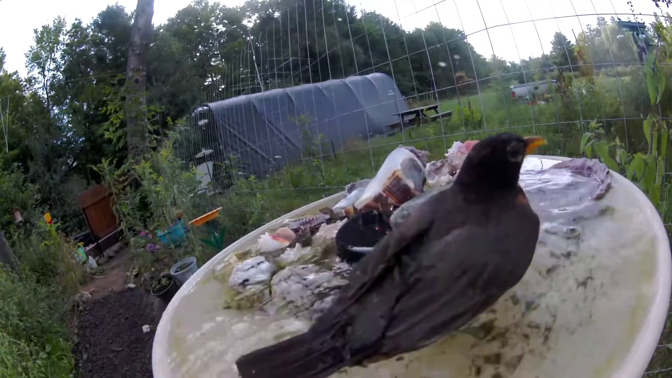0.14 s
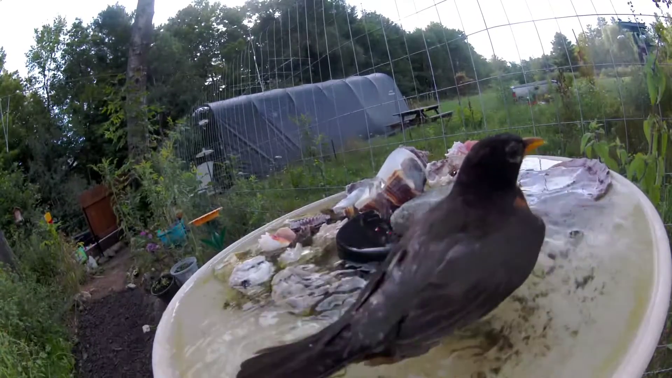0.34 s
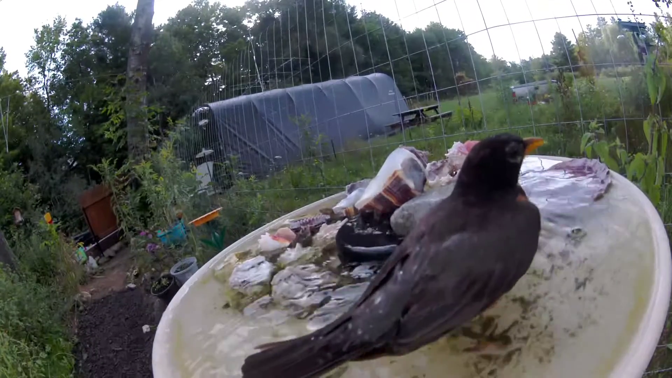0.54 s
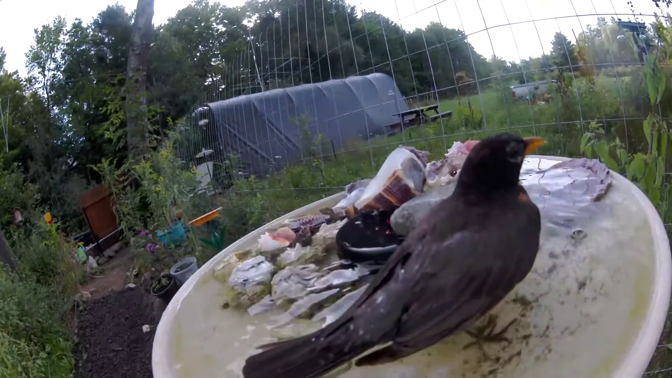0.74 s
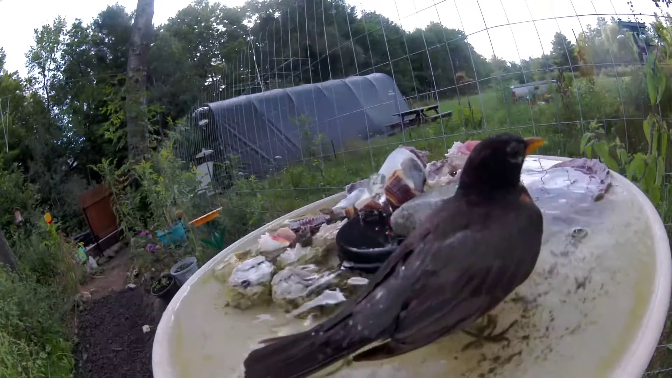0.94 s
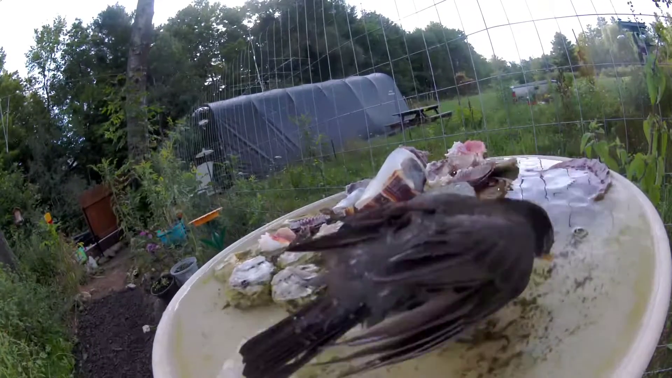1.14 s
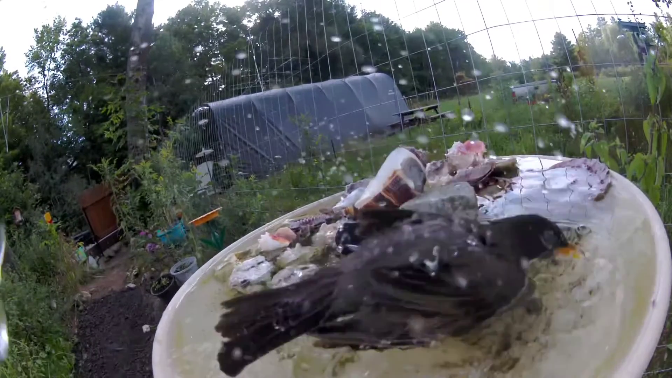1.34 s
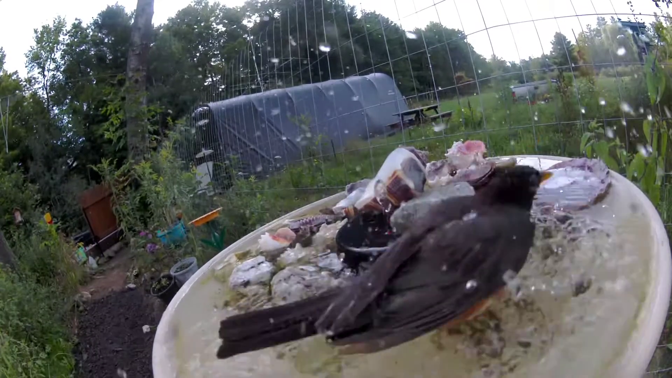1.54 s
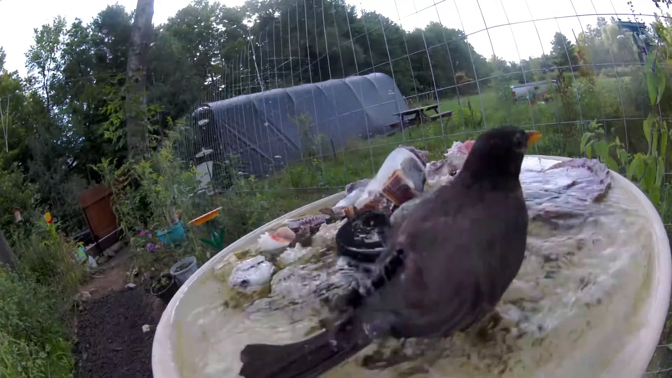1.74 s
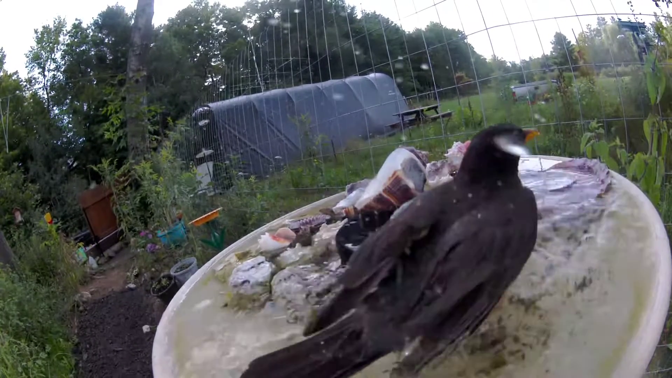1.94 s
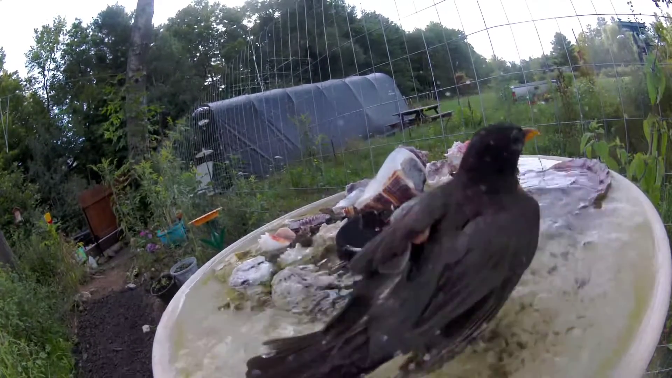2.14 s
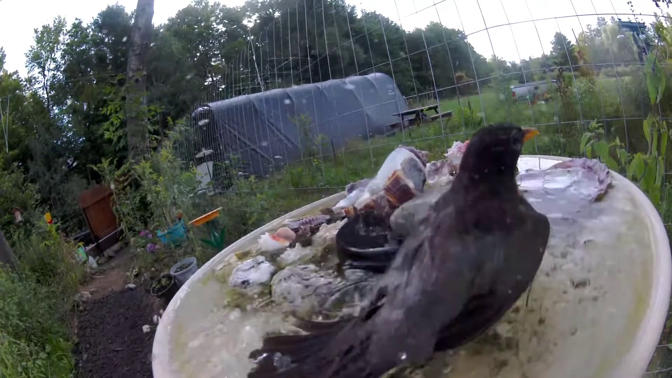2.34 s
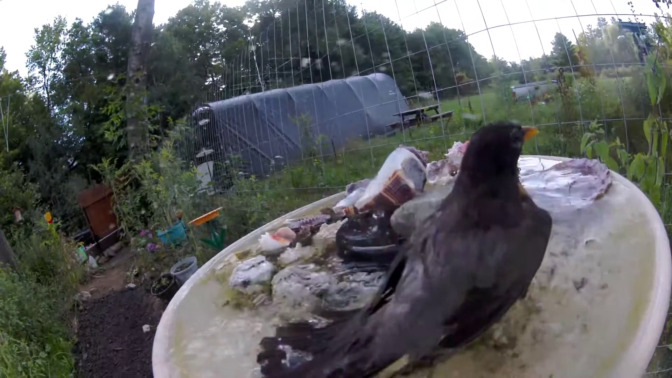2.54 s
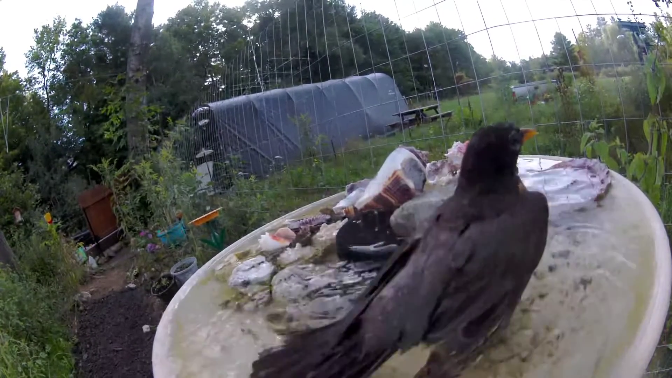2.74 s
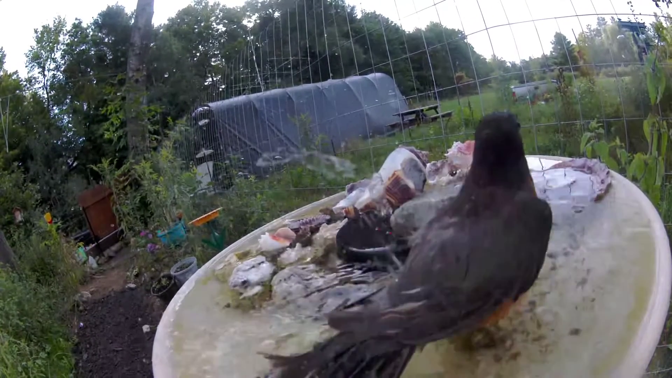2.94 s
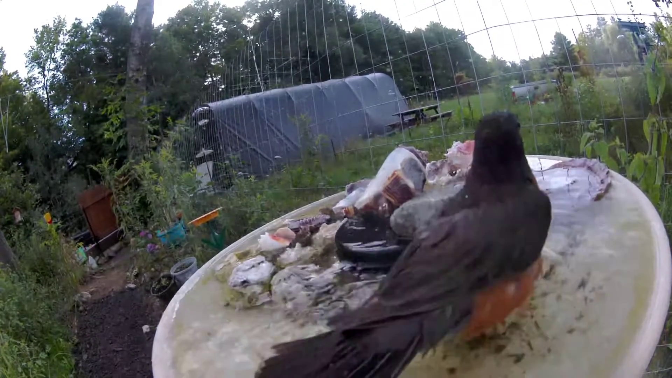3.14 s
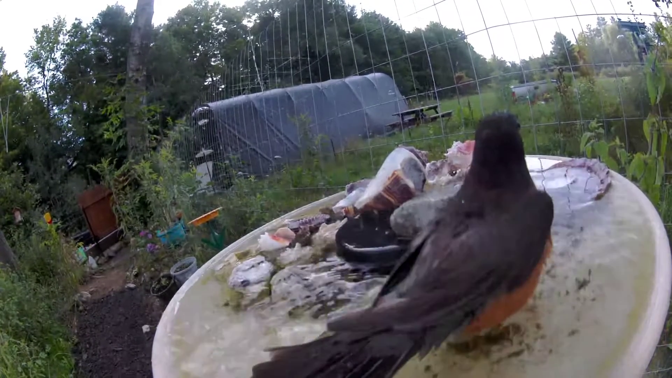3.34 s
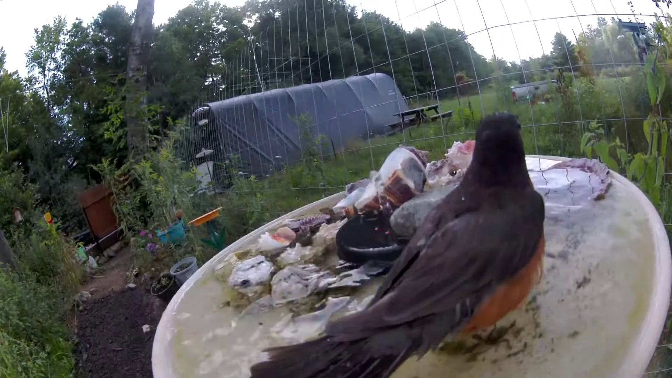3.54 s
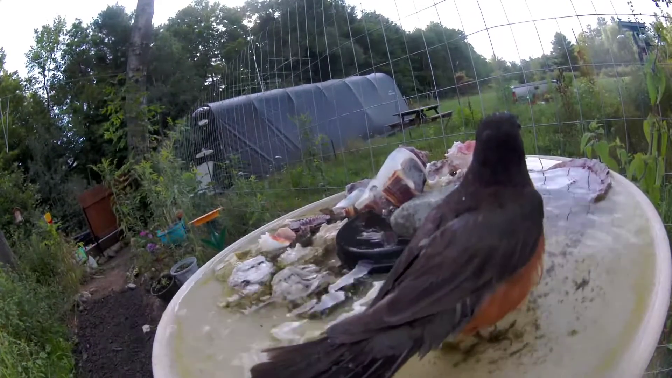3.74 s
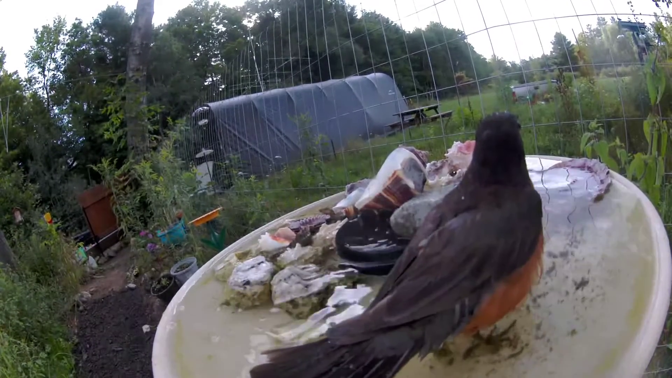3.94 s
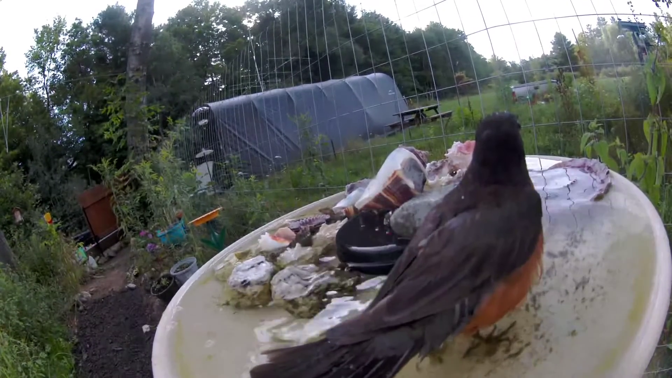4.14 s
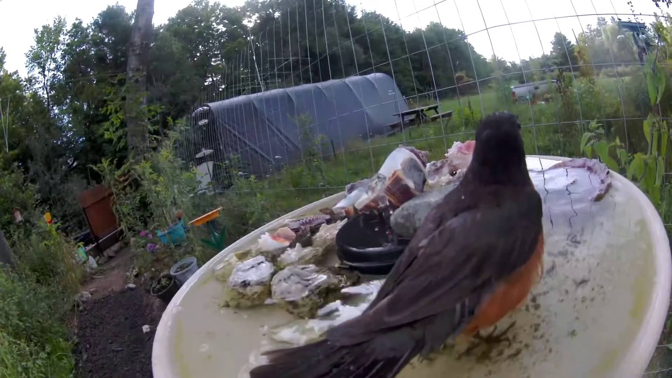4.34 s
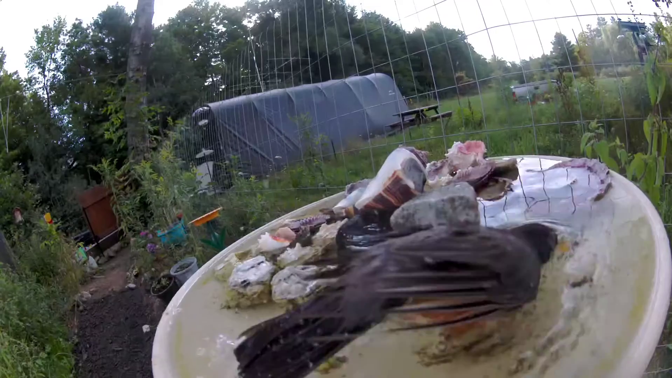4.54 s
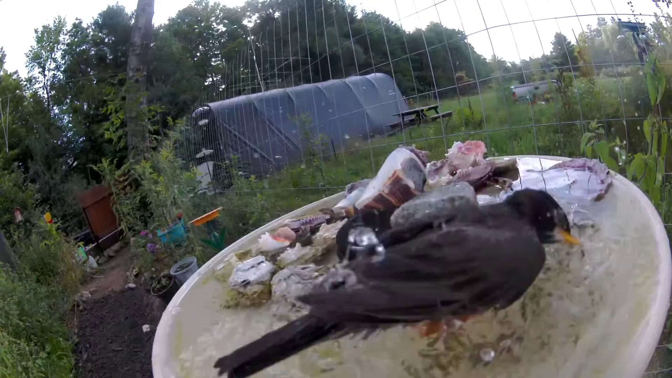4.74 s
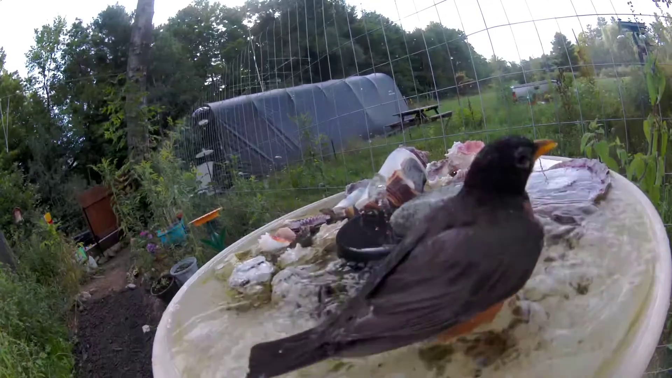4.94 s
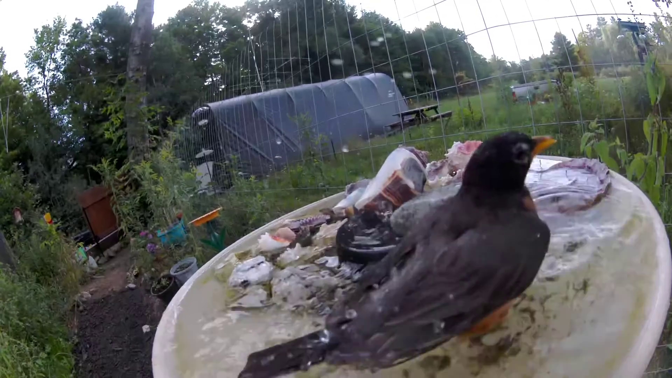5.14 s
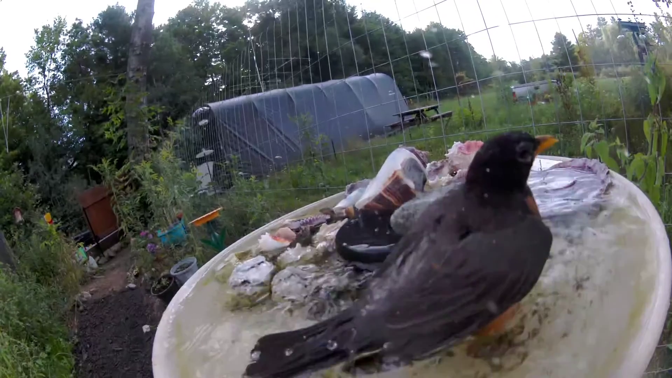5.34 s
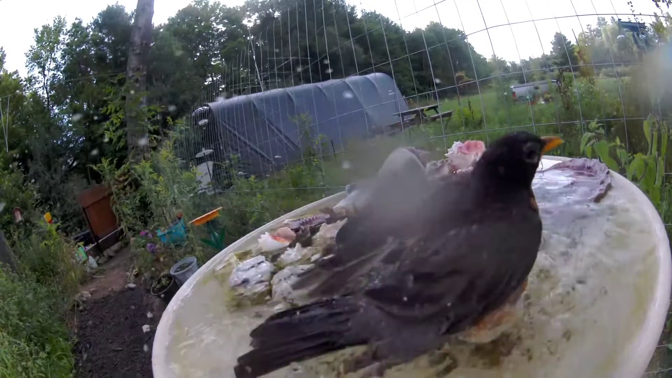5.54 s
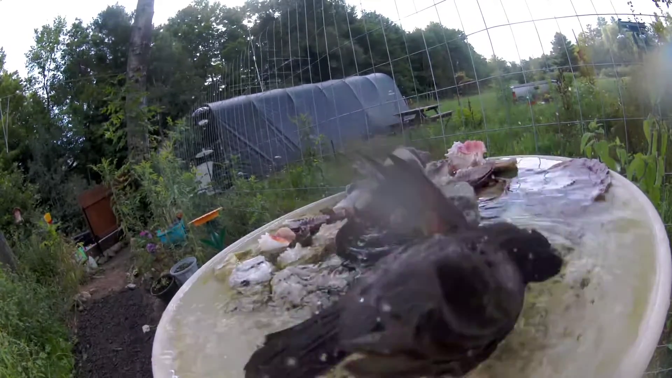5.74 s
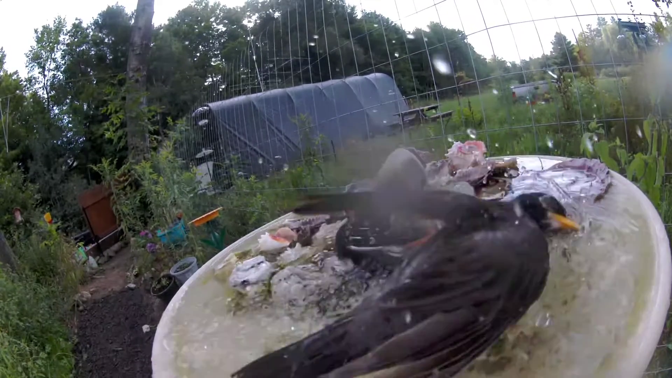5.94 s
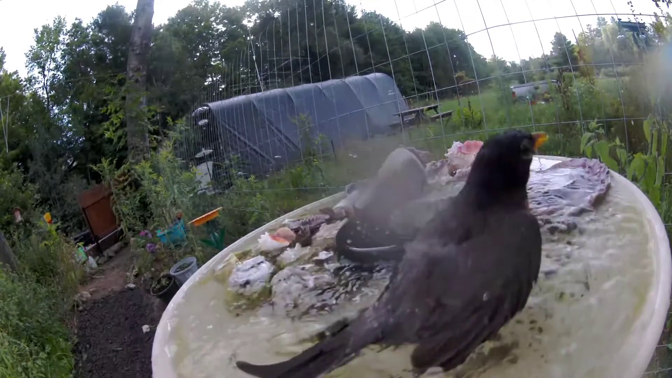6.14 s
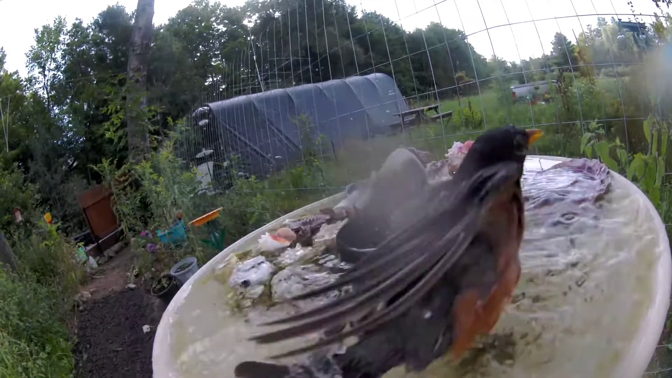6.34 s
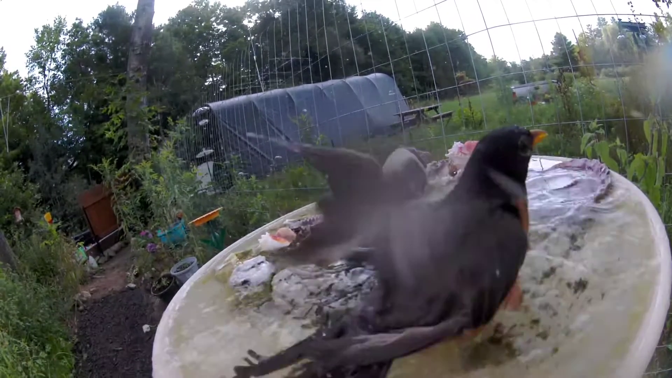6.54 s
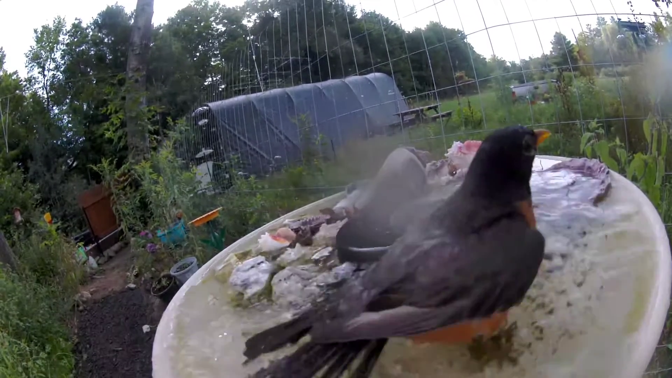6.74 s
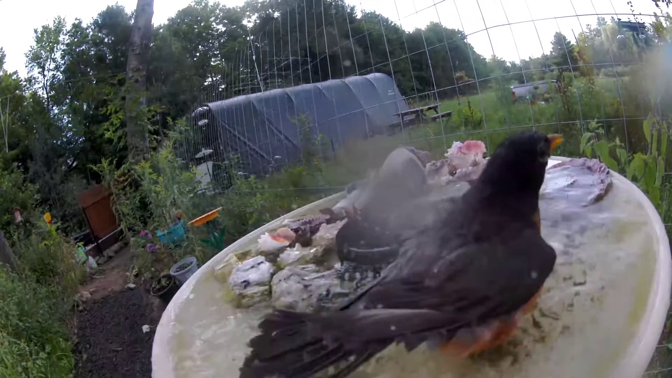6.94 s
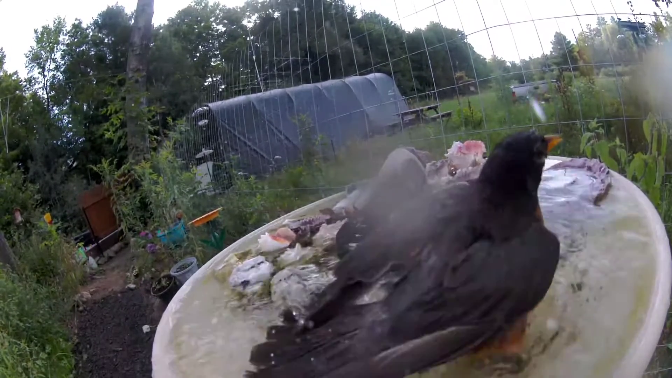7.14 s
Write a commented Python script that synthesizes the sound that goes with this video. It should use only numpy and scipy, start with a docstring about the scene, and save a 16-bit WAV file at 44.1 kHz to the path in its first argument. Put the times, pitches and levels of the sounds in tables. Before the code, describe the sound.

A robin bathes in a shallow birdbath, wet wings fluttering in rapid splashing bursts with low thumps, bubbly drips and faint distant traffic between.

```python
"""A garden birdbath, shallow, with a small camera on its rim: a robin bathes close beside it.
The bird churns the water, heard as surging noise and ringing bubbles, and in bursts flicks its wings about
eleven times a second: each flick is a pressure spike with crackle, a noise swish, bright spray and a resonant
housing boom. Drops ring as bubbles of gliding pitch. Behind lie shaped noises: air hum, far traffic
with an engine's drone and singing tyres, and a faint hiss."""
import sys
import numpy as np
from scipy import signal
from scipy.fft import rfft, irfft, next_fast_len
from scipy.io import wavfile
from scipy.ndimage import uniform_filter1d, map_coordinates

SR = 44100
rng = np.random.default_rng(int(sys.argv[2]) if len(sys.argv) > 2 else 0)


def log_audio(samples):
    """Write samples as a 16-bit WAV file to the path given in sys.argv[1]."""
    # one column per channel
    frames = np.atleast_2d(samples).T
    # limit to full scale, then quantise
    limited = np.clip(frames, -1, 1)
    pcm = np.round(limited * 32767).astype(np.int16)
    wavfile.write(sys.argv[1], SR, pcm)


N = 321930  # samples

# All levels in the tables are relative: each layer has its own further gain.
# Wing flicks: start_s, slap_db, slap_hz (sets the slap's band), boom_db, swish_db
FLICKS = [(0.055, -38, 1000, -29.5, -38.5), (0.161, -51, 800, -29, -51.5), (0.269, -37.5, 1450, -32.5, -54),
          (0.374, -46.5, 790, -33, -54), (1.222, -26, 1906, -23, -28), (1.408, -28.5, 1900, -22, -32.5),
          (1.826, -34, 2310, -25, -28), (1.921, -26, 3100, -30.5, -28), (2.008, -18.5, 1950, -35, -25.5),
          (2.1, -18.5, 2180, -26.5, -22), (2.177, -12, 2000, -17.5, -27), (2.259, -8.5, 1800, -13.5, -26.5),
          (2.339, -10, 1540, -9, -26.5), (2.419, -9, 1580, -6, -31), (2.504, -10, 1300, -10, -31.5),
          (2.589, -28, 2080, -24, -33.5), (2.684, -29, 1700, -33.5, -44), (2.772, -19.5, 2220, -25.5, -42),
          (2.887, -12.5, 2980, -30.5, -21.5), (2.975, -7, 2770, -16.5, -25.5),
          (3.078, -14.5, 1920, -22, -30.5), (3.196, -20, 2680, -29.5, -31),
          (5.013, -33, 2000, -29.5, -34.5), (5.098, -39, 3520, -30, -28.5),
          (5.172, -29.5, 2160, -28, -27.5), (5.262, -30, 1700, -23.5, -34), (5.338, -26, 1300, -30.5, -43),
          (5.423, -20, 3360, -26, -34), (5.541, -28, 1900, -28, -29.5), (5.785, -10.5, 4400, -31, -34),
          (6.041, -19.5, 1890, -27.5, -40), (6.141, -15.5, 2090, -33.5, -41),
          (6.239, -15.5, 1550, -27, -23.5), (6.344, -20, 2820, -17.5, -29), (6.435, -12, 2500, -23.5, -28),
          (6.44, -7, 3000, -16, -33.5), (6.525, -7.5, 2550, -10.5, -34), (6.616, -9, 1990, -9.5, -35.5),
          (6.707, -11, 1090, -12, -43.5), (6.819, -27.5, 1710, -26.5, -65),
          (6.923, -27.5, 3600, -28.5, -58), (7.01, -14, 1560, -18, -28), (7.099, -8.5, 1720, -22, -34.5),
          (7.19, -10, 1610, -12.5, -36.5), (7.288, -14, 1290, -26.5, -36)]
# Clearest drops and bubbles: start_s, level_db, pitch_hz (nominal), t60_s (nominal 60 dB decay)
DROPS = [(0.286, -33.5, 3180, 0.009), (1.324, -25, 2400, 0.031), (1.349, -25.5, 1115, 0.077),
         (1.353, -25, 5000, 0.02), (1.379, -16, 1350, 0.038), (1.38, -14.5, 2590, 0.012),
         (1.504, -26, 5330, 0.008), (1.604, -23, 1760, 0.0055), (1.661, -23.5, 3250, 0.013),
         (1.694, -18.5, 1960, 0.0034), (1.76, -27, 2640, 0.011), (1.766, -22, 1300, 0.015),
         (1.784, -25, 1740, 0.0095), (1.8, -28, 2070, 0.016), (2.193, -20.5, 2550, 0.032),
         (2.354, -18.5, 2750, 0.0052), (2.467, -30, 5820, 0.006), (2.519, -23, 1600, 0.046),
         (2.746, -29.5, 1910, 0.031), (2.894, -23.5, 3910, 0.026), (2.984, -8.5, 3370, 0.014),
         (3.21, -16, 3340, 0.01), (3.342, -41, 2650, 0.011), (3.799, -29.5, 2350, 0.0078),
         (4.528, -25, 2780, 0.0018), (4.616, -20, 4200, 0.012), (4.679, -21, 6200, 0.009),
         (4.727, -28.5, 1365, 0.073), (4.751, -25.5, 4010, 0.006), (4.818, -28, 6680, 0.0054),
         (5.102, -19.5, 3440, 0.022), (5.149, -24.5, 1890, 0.013), (5.243, -22, 3060, 0.007),
         (5.336, -15.5, 1256, 0.037), (5.361, -25, 1550, 0.018), (5.422, -16.5, 3240, 0.009),
         (5.473, -24, 3000, 0.011), (5.486, -23, 3930, 0.012), (5.6085, -16, 6240, 0.004),
         (5.678, -17, 2780, 0.0091), (5.686, -15, 3560, 0.0038), (5.784, -6.5, 3925, 0.0052),
         (5.822, -25.5, 1840, 0.018), (5.829, -16, 3340, 0.0021), (5.843, -16.5, 3090, 0.019),
         (5.873, -15, 3340, 0.017), (5.922, -20, 4110, 0.013), (6.053, -20.5, 2200, 0.0058),
         (6.173, -23.5, 5900, 0.0049), (6.241, -10, 1207, 0.025), (6.257, -19.5, 1018, 0.088),
         (6.308, -21, 3500, 0.0049), (6.348, -21, 2670, 0.02), (6.353, -14.5, 2180, 0.013),
         (6.627, -13, 5400, 0.004), (6.714, -21.5, 6560, 0.009), (7.034, -17, 2980, 0.022),
         (7.13, -22, 6800, 0.012), (7.236, -24.5, 4380, 0.0054)]
# Bouts of paddling, breast in the water: start_s (first stroke), length_s, strokes_per_s, first_db, last_db
BOUTS = [(0.063, 0.22, 9.2, -50, -48), (1.217, 0.21, 10.8, -33, -27.5), (1.476, 0.27, 11.7, -42, -35.5),
         (4.6, 0.15, 13.3, -29.5, -35.5), (5.104, 0.44, 11.7, -39.5, -31.5),
         (5.683, 0.24, 12.4, -31.5, -30.5), (6.278, 0.1, 13, -33.5, -34)]
# A far vehicle's uneven approach: time_s, engine_db, tyres_db
VEHICLE = [(0, -50.5, -63), (0.9, -59, -72), (3.0, -52, -54.5), (4.05, -54.5, -37.5), (4.5, -43, -55),
           (5.2, -38, -39), (6.05, -45.5, -56), (7.3, -40.5, -40)]
# Resonances of the camera housing: centre_hz, width_hz, gain_db
HOUSING = [(158.6, 52.2, 2), (216, 210, -18)]

# Noise spectra, each: frequency_hz, density_db (per Hz)
# Thrown water falling back
SPRAY_SPECTRUM = [(100, -37), (250, -9.5), (800, -5), (1400, -4.5), (3000, 20), (4700, -9), (7000, 29.5),
                  (8000, -23)]
# Stirred water
CHURNED_SPECTRUM = [(35, -74.5), (120, -11.5), (220, 7.5), (500, -4.5), (800, -1.5), (1300, 2.5), (2800, 6),
                    (4700, -1), (7000, -2), (8000, -44)]
# Swish of wet wing feathers
FEATHER_SPECTRUM = [(35, -59), (120, -3.5), (220, 8.5), (700, 1.5), (2000, 5), (3600, 4), (7000, -13.5),
                    (8000, -28.5)]
# A hard blow of air
THUD_SPECTRUM = [(60, -38.5), (200, 7), (400, 5.5), (700, -0.5), (1100, -17.5), (3000, -39.5), (8000, -70)]
# Low air noise in the housing
HUM_SPECTRUM = [(25, -47), (55, -43.5), (85, -22), (122, 1), (165, -4.5), (230, -17), (380, -19.5),
                (600, -34), (1500, -70.5)]
# Far traffic
TRAFFIC_SPECTRUM = [(100, -37), (300, -5), (480, -3.5), (790, 3), (1150, 0.5), (1600, -6), (2050, -10),
                    (2450, -19), (4000, -25), (8000, -44.5)]
# The far vehicle's engine
DRONE_SPECTRUM = [(90, -63), (140, -21.5), (175, 2.5), (255, -6), (330, -23.5), (500, -28), (1200, -41)]
# The far vehicle's tyres
TYRE_SPECTRUM = [(400, -47), (800, -9.5), (1000, 2), (1200, -10), (1450, -6), (2000, -9.5), (2700, -23.5),
                 (3500, -61.5)]
# Faint steady hiss
HISS_SPECTRUM = [(500, -9), (2500, -2.5), (4200, 4), (4850, 10), (5500, 5.5), (6800, 7), (8000, -16)]

MIC_HZ, TOP_HZ = 7800, 16000  # cutoffs of the microphone path, before and after clipping
SPRAY_DB, SPRAY_GROWS = -17.5, 0.67  # relative spray level at 0 dB slap; dB of spray per dB of slap
WASH_DB, WASH_S = -19, 0.15  # ripples left by a flick, against its spray; their decay time
BOUT_RISE_S, BOUT_FALL_S = 0.031, 0.03  # the bird sinks in and lifts out
STROKE_DB = 3  # peak swell of each stroke over the mean level
STRAY_DB, STRAY_SPREAD_DB = -32.5, 2  # the lesser drops: level and its scatter
STRAY_HZ, STRAY_OCTAVES, STRAY_CYCLES = 3630, 0.72, 11  # middle pitch, its scatter, cycles in the nominal t60
FLIGHT_S = 0.03  # mean time the lesser drops spend in the air
HUM_DB, TRAFFIC_DB = -44.5, -43.5  # mean background levels
DRAUGHT_DB, DRAUGHT_S = -43, 0.31  # extra hum around the stirring; span over which it is averaged
SWOOP_HZ, SWOOP_S = 1200, 0.00059  # a forming bubble's extra pitch at its start; time constant of its fall
RISE_PER_S, WAVER = 9, 0.035  # share of its pitch climbed each second; rms share by which it wavers


def amp(db):
    """Level to amplitude: twenty decibels make a factor of ten."""
    return 10 ** (np.asarray(db) / 20)


def unit(x):
    """Normalisation: scale to rms 1."""
    return x / np.sqrt(np.mean(x ** 2) + 1e-20)


def along(points, hz):
    """Logarithmic interpolation: read (Hz, value) points on a log frequency axis."""
    point_hz, value = np.transpose(points)
    return np.interp(np.log(hz + 1), np.log(point_hz + 1), value)


def curves(rows):
    """Linear interpolation: one value per sample for each column after the time."""
    time_s, *columns = np.transpose(rows)
    return [np.interp(np.arange(N) / SR, time_s, column) for column in columns]


def wobble(rate):
    """Slow random modulation: a smooth curve through rate random knots a second."""
    knots = rng.standard_normal(int(N * rate / SR) + 4)
    return map_coordinates(knots, [np.arange(N) * rate / SR])


def filtered(x, response):
    """Linear filtering: multiply the spectrum by a response of frequency."""
    size = next_fast_len(N + SR // 2)  # zero padding
    return irfft(rfft(x, size) * response(np.fft.rfftfreq(size, 1 / SR)), size)[..., :N]


def noise(spectrum):
    """Spectral shaping: Gaussian noise of rms 1 with the given colour."""
    return unit(filtered(rng.standard_normal(N), lambda hz: amp(along(spectrum, hz))))


def fizz(spectrum, spiky_db):
    """Amplitude modulation: coloured noise in countless tiny, unequal bursts, rms 1."""
    bursts = rng.standard_normal(N) * amp(spiky_db * np.clip(wobble(1400), -2.5, 2.5))
    return unit(filtered(bursts, lambda hz: amp(along(spectrum, hz))))


def add(track, s, sound):
    """Superposition: mix a sound into the track from time s on."""
    start = int(np.clip(round(s * SR), 0, N - 1))
    track[start:start + len(sound)] += sound[:N - start]


def droplets(count, cycles, spread_db, lowest_hz):
    """Bubble resonance: a steady patter of rms 1, each tiny bubble a decaying sine that rises a little."""
    t = np.arange(SR // 60) / SR
    when, pitch, life, size = rng.random((count, 4)).T[:, :, None]
    start_hz = lowest_hz * (MIC_HZ / lowest_hz) ** np.sqrt(pitch)  # small bubbles outnumber large ones
    phase = start_hz * (t + 5 * t ** 2)  # in cycles
    strength = amp(-spread_db * np.log(np.maximum(size, .05)))
    decay = np.exp(-phase / (.5 + cycles * life ** 2))
    rings = strength * np.sin(2 * np.pi * phase) * decay
    index = (when * N).astype(int) + np.arange(len(t))
    return unit(np.bincount(index.ravel(), rings.ravel())[:N])


def spray_level(slap_db):
    """Compressive growth: harder slaps throw more water, though not in proportion."""
    return amp(SPRAY_DB + SPRAY_GROWS * slap_db)


def stirring():
    """Energy addition: paddling swells with each stroke, and every flick leaves ripples that die away."""
    flow, t = np.zeros(N), np.arange(N) / SR
    for start, length, rate, first_db, last_db in BOUTS:
        age = t - start
        held = np.exp(np.minimum(age, 0) / BOUT_RISE_S - np.maximum(age - length, 0) / BOUT_FALL_S)
        level_db = np.interp(age, [0, length], [first_db, last_db])
        strokes_db = STROKE_DB * np.cos(2 * np.pi * rate * age)
        flow += held * amp(level_db + strokes_db)
    power = flow ** 2
    for s, slap_db, *_ in FLICKS:
        ripples = amp(WASH_DB) * spray_level(slap_db) * np.exp(-t[:SR] / WASH_S)
        add(power, s, ripples ** 2)
    return np.sqrt(power)


def garden():
    """Incoherent background: air hum that swells around the stirring, traffic, drone, tyres and hiss."""
    drone_db, tyres_db = curves(VEHICLE)
    drift = lambda: wobble(7)
    draught = unit(uniform_filter1d(stirring(), int(DRAUGHT_S * SR) + 1))
    hum_level = np.hypot(amp(HUM_DB), amp(DRAUGHT_DB) * np.sqrt(np.abs(draught)))
    hum = hum_level * amp(drift()) * noise(HUM_SPECTRUM)
    drone = amp(drone_db + 1.5 + drift()) * noise(DRONE_SPECTRUM)
    traffic = amp(TRAFFIC_DB + .5 * drift()) * noise(TRAFFIC_SPECTRUM)
    tyres = amp(tyres_db - 3.5 + 2 * drift()) * noise(TYRE_SPECTRUM)
    return hum + drone + traffic + tyres + amp(-65.0) * noise(HISS_SPECTRUM)


def booms():
    """Forced resonance: the downstroke's air blow rings the housing, with gust noise and a thud."""
    gust, blows, thuds = np.zeros((3, N))
    t = np.arange(-SR // 25, SR // 25) / SR
    for s, _, _, boom_db, *_ in FLICKS:
        add(blows, s + t[0], amp(boom_db) * np.exp(-np.abs(t - .0008) / 0.00024))
        add(gust, s + t[0], amp(boom_db) * np.exp(-np.abs(t + .003) / 0.0086))
        # The thud grows faster than the boom, so it tells mainly in the hardest blows.
        add(thuds, s + t[0], amp(1.154 * boom_db) * np.exp(-np.abs(t - .0012) / 0.0012))

    def body(f):
        return sum(amp(db) * 1j * f * w / (hz * hz - f * f + 1j * f * w) for hz, w, db in HOUSING)

    air = noise([(30, -41.0), (90, -17.0), (180, 1.5), (300, -4.0), (700, -16.5), (2000, -43.0), (8000, -86.5)])
    ringing = amp(23.0) * filtered(blows, body)
    boom = ringing + amp(-11.5) * gust * air + amp(6.5) * thuds * noise(THUD_SPECTRUM)
    ports = [(30, -16), (70, -15.5), (100, -8), (125, -1)]  # the small ports pass little bass
    return filtered(boom, lambda hz: amp(along(ports, hz)))


def spray():
    """Turbulence and scattered impacts: wet feathers swish; after the slap, thrown water falls back."""
    swish, thrown = np.zeros(N), np.zeros(N)
    t = np.arange(SR // 16) / SR
    for s, slap_db, _, _, swish_db in FLICKS:
        add(swish, s - .02, amp(swish_db) * np.exp(-((t - .015) / 0.0082) ** 2))
        fall = (1 - np.exp(-t / 0.0023)) * np.exp(-t / 0.0092)
        add(thrown, s + 0.00033, spray_level(slap_db) * fall)
    patter = droplets(count=5500, cycles=21, spread_db=3.5, lowest_hz=1300)
    falling = amp(-2.0) * fizz(SPRAY_SPECTRUM, spiky_db=8) + amp(5.5) * patter
    return swish * fizz(FEATHER_SPECTRUM, spiky_db=4.5) + thrown * falling


def slaps():
    """Impact: each wing meets the water in one sharp pressure spike amid a brief, ragged crackle."""
    track, t = np.zeros(N), np.arange(SR // 40) / SR
    smooth = signal.butter(2, MIC_HZ, fs=SR, output="sos")
    spike = unit(np.arange(len(t)) == SR // 1400)  # one sample, about 0.7 ms in
    for s, slap_db, hz, *_ in FLICKS:
        grain = rng.standard_normal(len(t))
        ragged = grain * np.abs(grain)
        crackle = unit(ragged * (1 - np.exp(-t / 0.0016)) * np.exp(-t / 0.0015))
        band = np.clip([hz * 0.55, hz * 1.215], 50, MIC_HZ)
        bandpass = signal.butter(1, band, "bandpass", fs=SR, output="sos")
        crack = signal.sosfilt(bandpass, 1.4 * crackle - spike)
        add(track, s, amp(slap_db - 8.5) * unit(signal.sosfilt(smooth, crack)))
    return track


def churning():
    """Air entrainment: water fizzes in uneven surges and, stirred harder, breaks into bubbles."""
    surges = amp(2.2 * np.clip(wobble(130), -2, 1.6))
    flow = stirring() * surges
    broken = flow / (flow + amp(-29))  # gentle ripples trap little air
    bubbles = droplets(count=2800, cycles=10, spread_db=5.5, lowest_hz=980)
    return flow * (amp(-3.0) * fizz(CHURNED_SPECTRUM, spiky_db=4.5) + amp(-2.25) * broken * bubbles)


def stray_drops(count):
    """Random emission: rows like DROPS, flying up most often while the water moves hardest."""
    share = np.cumsum(stirring())
    turns = (np.arange(count) + rng.random(count)) / count  # one drop per equal share of the stirring
    thrown_s = np.searchsorted(share / share[-1], turns) / SR
    size, pitch = rng.standard_normal((count, 2)).T
    hz = np.clip(STRAY_HZ * 2 ** (STRAY_OCTAVES * pitch), 0, MIC_HZ)
    landing_s = thrown_s + FLIGHT_S * rng.exponential(size=count)
    return list(zip(landing_s, STRAY_DB + STRAY_SPREAD_DB * size, hz, STRAY_CYCLES / hz))


def drops():
    """Bubble oscillation: after a tick, pitch sinks as the bubble forms, then rises, wavering, near the surface."""
    track, t = np.zeros(N), np.arange(SR // 8) / SR
    for s, db, hz, t60 in list(DROPS) + stray_drops(count=60):
        forming = SWOOP_HZ * np.exp(-t / SWOOP_S)
        waver = WAVER * unit(uniform_filter1d(rng.standard_normal(len(t)), size=90))
        phase = np.cumsum(hz * (0.942 + RISE_PER_S * t + waver) + forming) / SR
        decay = amp(-60 * t / (t60 + 0.0074))
        ring = np.sin(2 * np.pi * phase) * decay * (1 - np.exp(-t / 0.00012))
        tick = .27 * rng.standard_normal(len(t)) * np.exp(-t / .0016)
        drop = ring + tick
        onset_rms = np.sqrt(np.mean(drop[:SR // 650] ** 2))
        add(track, s, amp(db) * drop / onset_rms)
    return track


def scene():
    """Reflection and stereo: the bath answers faintly; channels part a little in the deepest bass and treble."""
    bath = churning() + slaps() + spray() + drops()
    t = np.arange(SR // 8) / SR
    tail = rng.standard_normal(len(t)) * amp(-60 * t / 0.035)
    answer = amp(-14) * signal.fftconvolve(bath, tail / np.linalg.norm(tail))[:N]
    middle = bath + answer + booms() + garden()
    width = [(30, -15.0), (130, -51.5), (1000, -37.5), (2200, -34.5), (7000, -22.0)]
    side = filtered(middle, lambda hz: 1j * amp(along(width, hz)))  # a quarter cycle from the middle
    return np.array([middle + side, middle - side])


def record(dry):
    """Band limiting and overload: a narrow microphone path clips whatever exceeds full scale."""
    narrow = filtered(dry, lambda hz: 1 / np.sqrt(1 + (hz / MIC_HZ) ** 90))
    return filtered(np.clip(narrow, -1, 1), lambda hz: 1 / np.sqrt(1 + (hz / TOP_HZ) ** 90))


dry = scene()
out = record(dry)
log_audio(out)
```